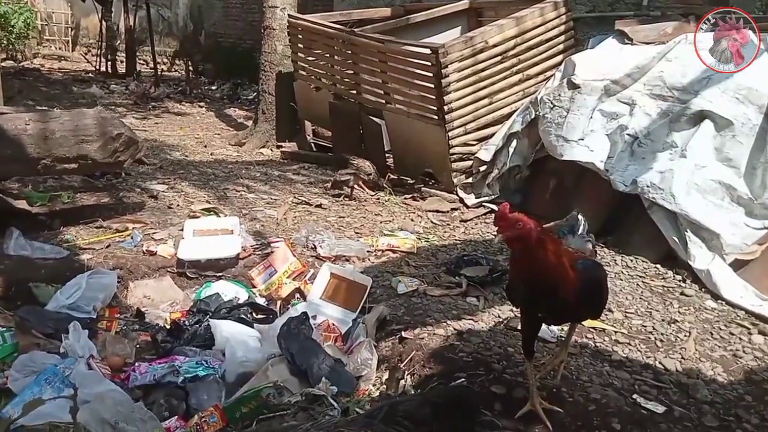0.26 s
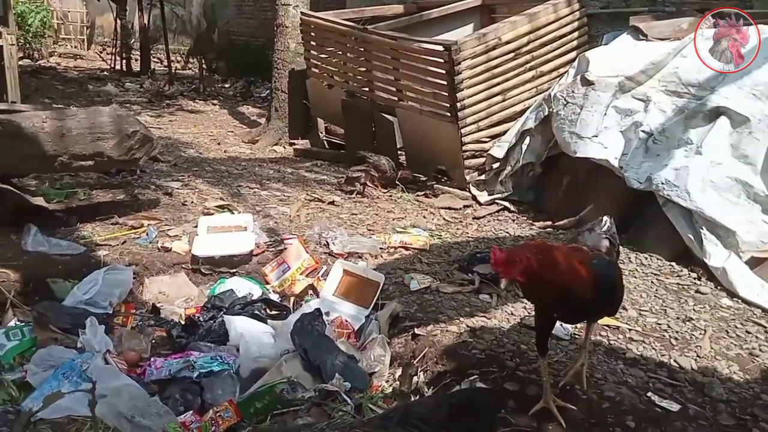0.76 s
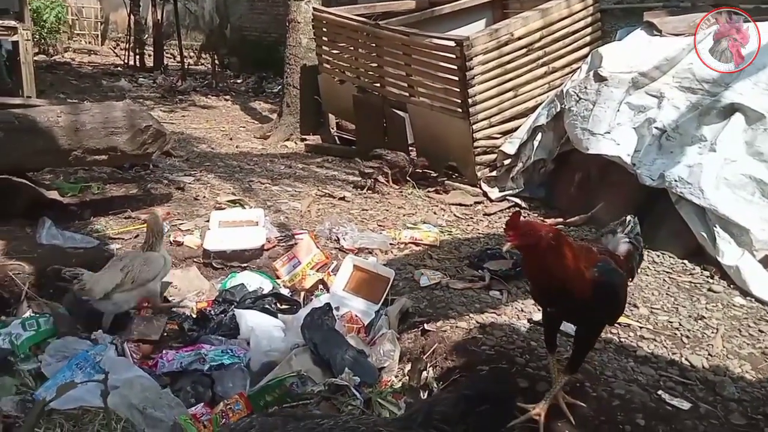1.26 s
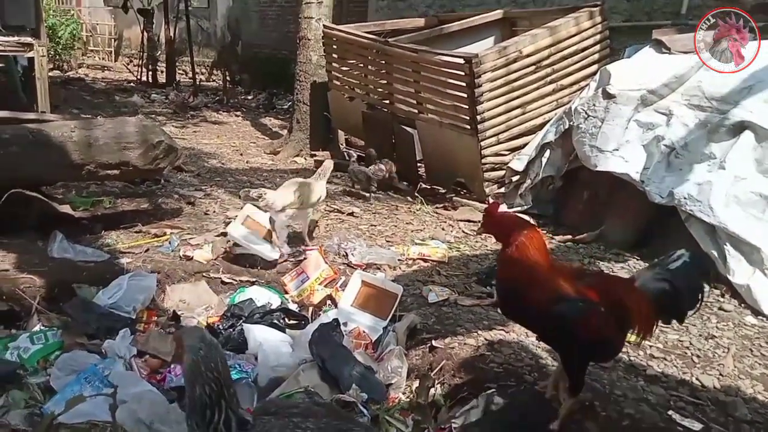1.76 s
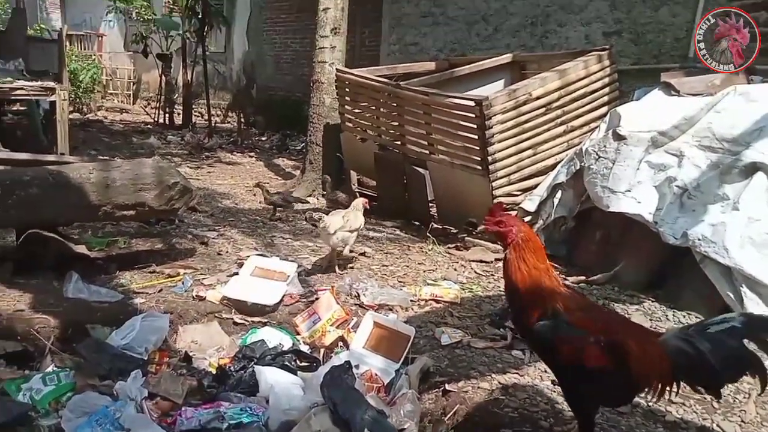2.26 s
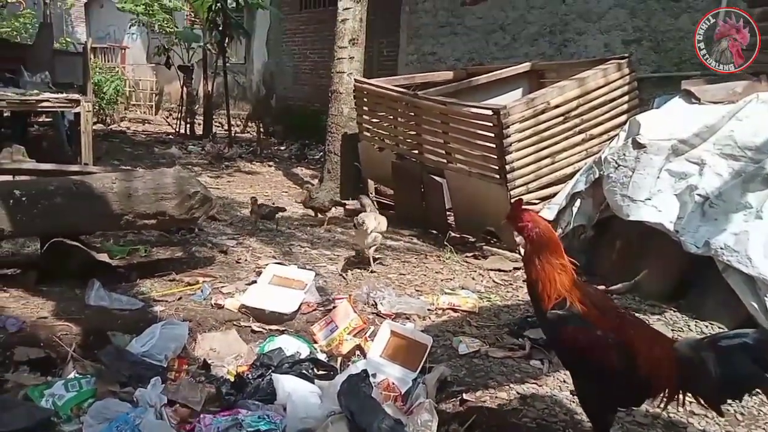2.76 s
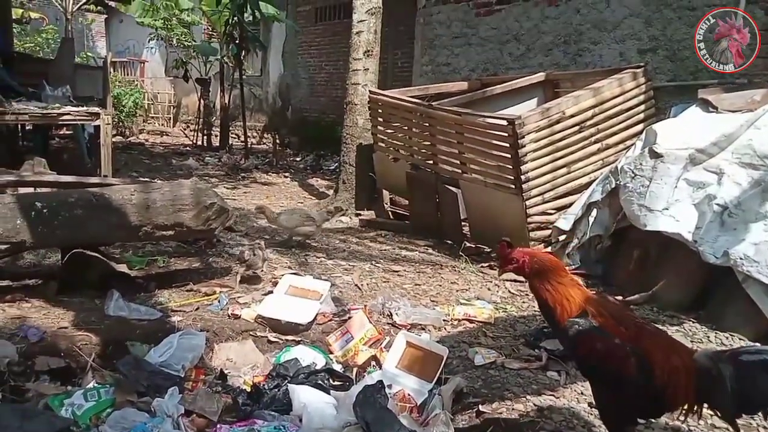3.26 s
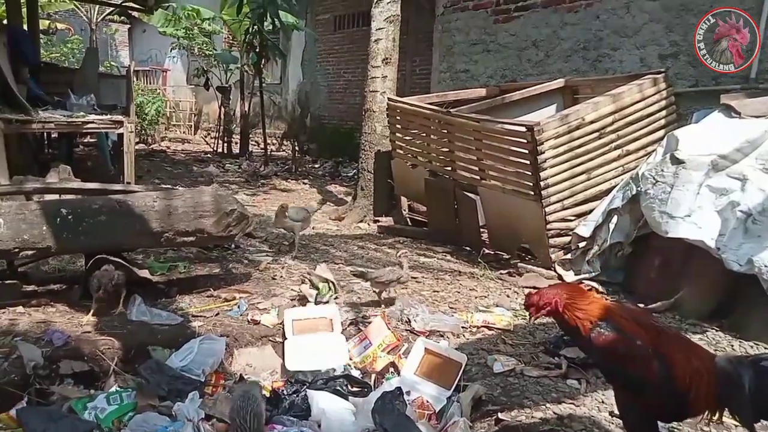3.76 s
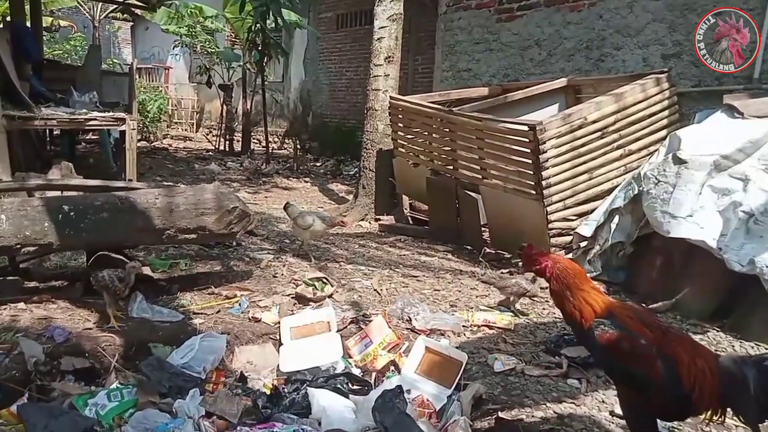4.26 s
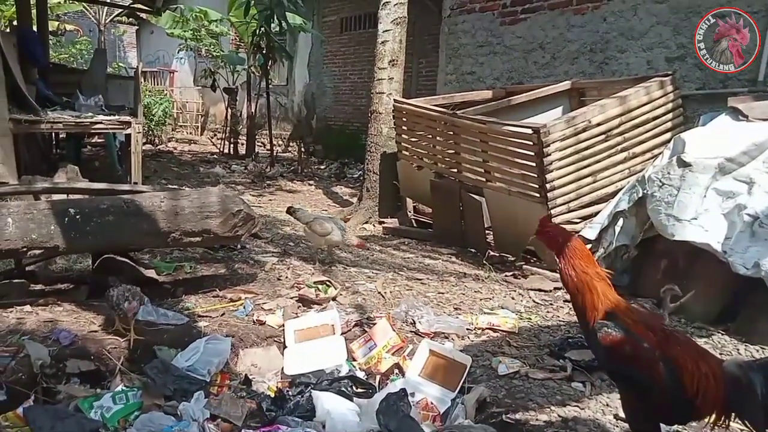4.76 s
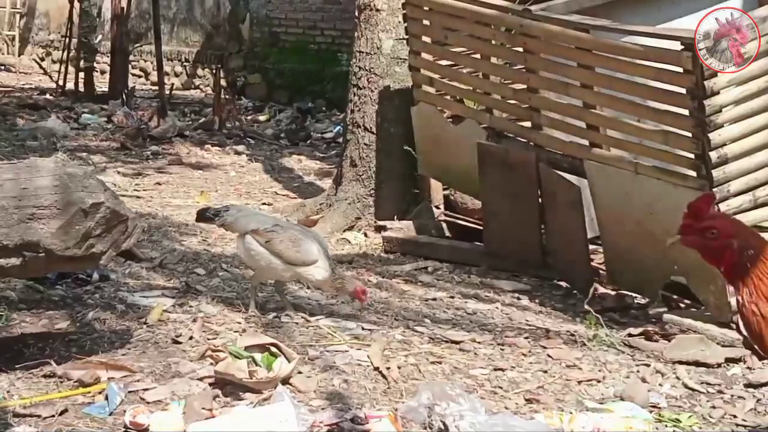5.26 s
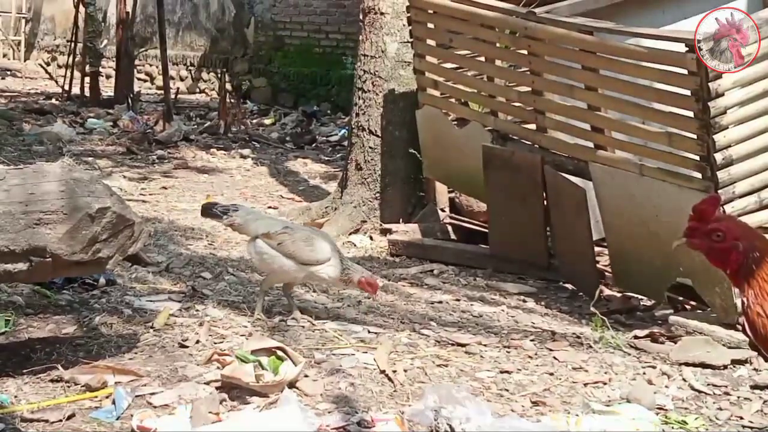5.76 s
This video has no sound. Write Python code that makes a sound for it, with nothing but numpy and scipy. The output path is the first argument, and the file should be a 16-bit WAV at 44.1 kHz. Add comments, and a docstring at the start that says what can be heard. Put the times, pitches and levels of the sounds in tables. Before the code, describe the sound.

Bursts of crisp leaf rustling and sharp cracks over airy outdoor hiss, with thin chick peeps and later low, husky hen clucks.

```python
"""A dusty yard strewn with dry leaves and litter, where chickens walk about; both channels are alike.
Feet crunch leaves and scuff soil as bursts of tiny fractures; brittle leaves snap as ringing cracks.
Bumped litter knocks in two damped modes. Chicks peep in gliding tones, a hen croons in tone and husky noise.
A brood twitters farther off in blurred peeps, and the open air is a fading rumble, rush and hiss of noise."""
import sys
import numpy as np
from scipy import signal
from scipy.fft import rfft, irfft
from scipy.io import wavfile

SR = 44100
rng = np.random.default_rng(int(sys.argv[2]) if len(sys.argv) > 2 else 0)


def int16_out(signal):
    """Quantize to a 16-bit WAV file."""
    q = np.round(np.clip(np.atleast_2d(signal).T, -1, 1) * 32767)
    wavfile.write(sys.argv[1], SR, q.astype(np.int16))


N = 264600


def from_db(db):
    """Decibels to gain."""
    return 10 ** (np.asarray(db) / 20)


def rms_one(x):
    """Scale to unit rms."""
    return x / np.sqrt(np.mean(x ** 2) + 1e-20)


def clock():
    """Time of every sample [s]."""
    return np.arange(N) / SR


def decay(t, t60):
    """Exponential decay that falls by 60 dB in t60 seconds."""
    return np.exp(-np.log(1000) * t / t60)


def coloured(x, spectrum, skirt_db=40):
    """Give x a spectrum that falls by skirt_db an octave beyond its ends; rms 1."""
    hz, db = np.transpose(spectrum)
    octave = np.log2(np.maximum(np.fft.rfftfreq(N, 1 / SR), 1))
    known = np.log2(hz)
    outside = np.abs(octave - np.clip(octave, known[0], known[-1]))
    gain = from_db(np.interp(octave, known, db) - skirt_db * outside)
    return rms_one(irfft(rfft(x) * gain, N))


def drift(rate, count=N):
    """Random wander in straight lines between `rate` normal random values a second."""
    at = np.arange(count) / SR * rate
    knots = rng.standard_normal(int(at[-1]) + 2)
    return np.interp(at, np.arange(len(knots)), knots)


def swell(start, end, edge):
    """An arch between two times; a small edge power makes it squarer."""
    along = np.clip((clock() - start) / (end - start), 0, 1)
    return (4 * along * (1 - along)) ** edge


def resonance(x, hz, width_hz):
    """A two-pole resonance with gain 1 on top."""
    radius = np.exp(-np.pi * width_hz / SR)
    angle = 2 * np.pi * hz / SR
    zeros = np.array([1, 0, -1]) * (1 - radius ** 2) / 2
    poles = [1, -2 * radius * np.cos(angle), radius ** 2]
    return signal.lfilter(zeros, poles, x)


def add(out, s, sound):
    """Mix a short sound in at time s."""
    at = int(s * SR)
    out[at:at + len(sound)] += sound[:max(N - at, 0)]


def grains(per_s, spread_db):
    """Random tiny fractures; a positive spread makes a few much larger, a negative one much smaller."""
    sizes = from_db(spread_db * np.minimum(rng.exponential(1, N), 4))
    signs = rng.choice([-1, 1], N)
    return sizes * signs * (rng.random(N) < per_s / SR)


def arch(length_s, pitches):
    """A smooth glide through a first, a middle and a last pitch."""
    curve = np.polyfit([0, .5, 1], pitches, 2)
    return np.polyval(curve, np.linspace(0, 1, int(length_s * SR)))


def call(hz, octave_db, jitter, shimmer_db, edge):
    """A bird's note: a tone and its octave follow a pitch glide, unsteady in pitch and strength."""
    along = np.linspace(0, 1, len(hz))
    unsteady_hz = hz * (1 + jitter * drift(420, count=len(hz)))
    phase = 2 * np.pi * np.cumsum(unsteady_hz) / SR
    tone = np.sin(phase) + from_db(octave_db) * np.sin(2 * phase)
    shimmer = from_db(shimmer_db * drift(297, count=len(hz)))
    effort = np.abs(np.sin(np.pi * along)) ** edge * shimmer
    return np.sqrt(2) * tone * effort


def husk(hz, flutter_hz):
    """Hoarse voice: a narrow band of noise that follows the pitch."""
    phase = 2 * np.pi * np.cumsum(hz) / SR
    sine_part = drift(flutter_hz, count=len(hz)) * np.sin(phase)
    cosine_part = drift(flutter_hz, count=len(hz)) * np.cos(phase)
    return rms_one(sine_part + cosine_part)


def scatter(x, t60, dull_hz=9000):
    """Diffuse reflections from walls, crate and litter, about as strong as x."""
    t = np.arange(SR // 2) / SR
    tail = rng.standard_normal(len(t)) * decay(t, t60)
    tail = signal.lfilter(*signal.butter(1, dull_hz, fs=SR), tail)
    return signal.fftconvolve(x, tail / np.linalg.norm(tail))[:N]


def footsteps(stray_db=-57, clump_db=-2.5, clumps_per_s=110):
    """Each foot crushes leaves in uneven clumps, scuffs soil and drags its claws; stray leaves tick throughout."""
    # feet in the leaves: (start [s], end [s], leaf crunch [dB], dull soil scuff [dB], claw rasp [dB])
    steps = [(0.694, 0.779, -34, -55, -57), (0.885, 0.93, -36.5, -60, -41), (.915, 1.01, -35, -56, -40.5),
             (1.03, 1.1, -42.5, -53, -56), (1.203, 1.328, -35, -45, -43), (1.337, 1.423, -41, -42, -45),
             (1.412, 1.528, -37.5, -44.5, -44), (1.53, 1.604, -41, -57, -41.5),
             (1.603, 1.675, -36, -38.5, -42), (1.667, 1.725, -35.5, -45, -37),
             (1.797, 1.97, -42.5, -61, -47), (2.035, 2.066, -43.5, -61, -52), (2.58, 2.617, -46, -47, -43),
             (2.956, 3.055, -40.5, -48, -42), (3.05, 3.203, -45, -54, -45), (3.35, 3.44, -46, -52, -47),
             (3.47, 3.6, -42, -41.5, -40), (4.275, 4.34, -57, -46.5, -53), (5.267, 5.29, -38, -47, -51),
             (5.286, 5.317, -38, -43, -43), (5.31, 5.46, -47, -45.5, -50)]
    # colours of crushed leaves, scuffed soil and rasping claws: (frequency [Hz], density [dB per Hz])
    leaf_colour = [(1500, -0.5), (3300, -7.5), (4900, 4.5), (6500, 1), (8000, 4.5), (9300, 12),
                   (10500, 5.5), (11600, 0), (13000, -5), (15500, -2.5)]
    soil_colour = [(50, -30), (140, 12), (270, 8), (450, 3.5), (900, 4), (1700, 5.5), (3000, -2), (6000, 0)]
    claw_colour = [(3900, -13), (4700, 1), (5600, 1), (6600, -2), (8000, -4)]
    crunch, scuff, drag = np.zeros((3, N))
    for start, end, crunch_db, scuff_db, rasp_db in steps:
        press = swell(start, end, edge=0.66)
        crunch += from_db(crunch_db) * press
        scuff += from_db(scuff_db) * press
        drag += from_db(rasp_db) * press
    clumps = from_db(clump_db * drift(clumps_per_s))
    leaves = crunch * clumps * coloured(grains(per_s=4900, spread_db=3.5), leaf_colour)
    soil = scuff * coloured(grains(per_s=3200, spread_db=-2.0), soil_colour)
    claws = drag * coloured(grains(per_s=1700, spread_db=3.0), claw_colour)
    stray = from_db(stray_db) * coloured(grains(per_s=370, spread_db=1.0), leaf_colour)
    return leaves + soil + claws + stray


def snaps(low_hz=4200, dip_hz=13200, dip_width_hz=3000, dip_share=0.7):
    """Brittle pieces crack: a noise burst rings one resonance, broad and short or narrower and clearer."""
    # leaves and litter snapping under beak or claw:
    # (time [s], peak level [dB], pitch [Hz], 60 dB decay of the burst [s], sharpness of the ring [Q])
    cracks = [(0.7255, -25, 6500, .005, 2.5), (0.9033, -25, 9200, .02, 3), (0.912, -26, 5000, .014, 5),
              (.979, -26, 4750, .014, 6), (1.3776, -23, 9000, .006, 3), (1.4282, -20, 5400, .006, 3),
              (1.438, -20.5, 5100, .012, 3), (1.494, -20.5, 4960, .016, 4.4), (1.5197, -24, 9200, .005, 3),
              (1.649, -17, 4800, 0.0088, 2.4), (1.6555, -22, 4800, .012, 4), (1.678, -24, 8000, .014, 6),
              (1.6888, -20, 4950, 0.014, 9), (1.6948, -18, 4820, 0.024, 9), (1.7, -19, 5060, 0.018, 8),
              (1.7235, -25, 9500, .01, 8), (3.0177, -19, 7000, 0.0042, 5.1), (3.0663, -23, 4500, .008, 6),
              (3.3348, -22, 8550, .02, 9), (3.4895, -23, 5760, .016, 4.1), (5.2533, -25, 6500, .012, 2),
              (5.266, -13.5, 6540, .009, 3.7), (5.27, -11.5, 9500, .003, 4.7),
              (5.2762, -22, 9800, 0.0074, 2), (5.294, -14, 7300, 0.0025, 1.8),
              (5.2984, -12.5, 6700, 0.0026, 2.5), (5.3877, -18, 5730, 0.012, 2.4),
              (5.3978, -23.5, 6500, .005, 1.5), (5.4623, -27, 6950, .004, 2), (5.4924, -27, 8500, 0.012, 2),
              (5.555, -26, 8000, .006, 1.1), (5.6696, -18.5, 7600, 0.0059, .9),
              (5.6765, -30, 9000, 0.054, .8)]
    out, t = np.zeros(N), np.arange(SR // 25) / SR
    thin = signal.butter(2, low_hz, "high", fs=SR, output="sos")
    for s, db, hz, t60, sharpness in cracks:
        burst = rng.choice([-1, 1], len(t)) * decay(t, t60)
        crack = signal.sosfilt(thin, resonance(burst, hz, hz / sharpness))
        crack = crack - dip_share * resonance(crack, dip_hz, dip_width_hz)   # a hollow in the high treble
        add(out, s, from_db(db) * crack / np.abs(crack).max())
    return out


def bumps(rise_s=0.00069, overtone=1.895, overtone_db=-5.5, crinkle_db=1, crinkle_t60=0.035):
    """A soft bump sets light litter ringing for a few cycles in two damped modes, and its skin crinkles."""
    # feet or beak on hollow litter: (time [s], peak level [dB], pitch [Hz], 60 dB decay of the modes [s])
    knocks = [(1.4367, -19, 740, 0.015), (1.7008, -22.5, 1586, 0.015), (1.704, -28.5, 1000, 0.01),
              (1.7112, -28, 884, 0.013), (1.7125, -34, 1550, .014), (3.002, -24, 2150, 0.0081),
              (3.49, -24.5, 930, 0.0085), (5.265, -27.5, 1420, .004)]
    out, t = np.zeros(N), np.arange(SR // 10) / SR
    for s, db, hz, t60 in knocks:
        low_mode = np.sin(2 * np.pi * hz * t)
        high_mode = from_db(overtone_db) * np.sin(2 * np.pi * hz * overtone * t)
        crinkle = from_db(crinkle_db) * resonance(rng.standard_normal(len(t)), hz, hz)
        knock = (low_mode + high_mode) * decay(t, t60) + crinkle * decay(t, crinkle_t60)
        knock = knock * (1 - np.exp(-t / rise_s))   # soft onset
        add(out, s, from_db(db) * knock / np.abs(knock).max())
    return out


def chicks():
    """Thin whistles: a tone and its octave glide through three pitches, unsteady in pitch and strength."""
    # chick peeps: (start [s], end [s], first pitch [Hz], middle pitch [Hz], last pitch [Hz], level [dB])
    peeps = [(2.982, 3.005, 4140, 4100, 4300, -42), (3.187, 3.21, 4830, 4200, 3450, -41),
             (3.305, 3.337, 4910, 4450, 2870, -35), (4.829, 4.858, 3630, 3540, 3480, -49),
             (5.005, 5.055, 3750, 3520, 3320, -52), (5.14, 5.2, 4580, 4760, 4520, -44.5),
             (5.622, 5.675, 4540, 4380, 4220, -45.5), (5.778, 5.808, 4180, 4170, 3950, -51),
             (5.808, 5.845, 3560, 3430, 3200, -47), (5.884, 5.946, 3730, 3600, 3450, -54.5),
             (5.962, 6.025, 4450, 4540, 4230, -48.5)]
    # lower peeps are reedier: (first pitch [Hz], octave overtone against the tone [dB])
    reediness = [(3500, -1), (4400, -26)]
    out = np.zeros(N)
    for start, end, first_hz, middle_hz, last_hz, db in peeps:
        octave_db = np.interp(first_hz, *np.transpose(reediness))
        glide = arch(end - start, (first_hz, middle_hz, last_hz))
        peep = call(glide, octave_db, jitter=.019, shimmer_db=3.2, edge=.25)
        add(out, start, from_db(db) * peep)
    return out


def hen(jitter=0.022, swell_db=5, low_flutter_hz=360, high_flutter_hz=240):
    """Soft notes through a nearly closed beak slide up to a held pitch and on to a last, husky at both ends."""
    # the hen's notes: (start [s], end [s], first pitch [Hz], held pitch [Hz], last pitch [Hz], level [dB],
    # octave overtone against the tone [dB], roughness of the held part [0-1])
    croons = [(5.195, 5.3, 715, 745, 770, -56, 6.5, .88), (5.29, 5.325, 810, 812, 818, -54.5, 11.5, .4),
              (5.31, 5.43, 840, 880, 890, -60, 6.5, .95), (5.498, 5.695, 715, 803, 765, -48, 6.8, .33),
              (5.805, 6.06, 775, 790, 785, -50.5, 0, .84)]
    stages = [0, 0.288, 0.58, 1]   # shares of a note; the pitch is level between the middle two
    edge_rough = 0.88   # the voice breaks up as a note starts and ends
    edge_dull_db = 12   # the overtone of a wholly clear note would sink this far there
    out = np.zeros(N)
    for start, end, first_hz, held_hz, last_hz, db, octave_db, held_rough in croons:
        along = np.linspace(0, 1, int((end - start) * SR))
        hz = np.interp(along, stages, [first_hz, held_hz, held_hz, last_hz])
        slack = np.interp(along, stages, [1, 0, 0, 1])
        sag = slack * (1 - held_rough)   # hoarse notes swell and brighten less
        loudness = from_db(db - swell_db * sag) * np.sin(np.pi * along).clip(0) ** .25
        overtone_db = octave_db - edge_dull_db * sag
        rough = np.clip(held_rough + slack * (edge_rough - held_rough), 0, 1)
        clear = call(hz, overtone_db, jitter * rough, shimmer_db=0.5, edge=0)
        hoarse = husk(hz, low_flutter_hz) + from_db(overtone_db) * husk(2 * hz, high_flutter_hz)
        add(out, start, loudness * (np.sqrt(1 - rough ** 2) * clear + rough * hoarse))
    return out


def brood(count=380, hz=4520, spread_hz=450, fall_hz=280, length_s=.055, blur_t60=0.26):
    """Many faint falling peeps, blurred by distance into a soft twitter."""
    # chicks farther off: (time [s], level [dB])
    twitter_level = [(0, -80), (2.75, -52), (3.1, -44), (3.4, -44.5), (4.2, -51.5), (5.2, -50), (6, -59)]
    out = np.zeros(N)
    starts = (np.arange(count) + rng.random(count)) * N / SR / count
    for start in starts:
        pitch = hz + spread_hz * rng.standard_normal()
        glide = arch(length_s, (pitch + fall_hz, pitch, pitch - fall_hz))
        peep = call(glide, octave_db=-14, jitter=0.0278, shimmer_db=5, edge=0.34)
        add(out, start, peep)
    level_db = np.interp(clock(), *np.transpose(twitter_level))
    return rms_one(scatter(out, blur_t60)) * from_db(level_db)


def background(flutter_db=1.0, flutters_per_s=24.835, early_fade_db_per_s=0.46):
    """Open air as three coloured noises, flickering in level, sinking gently, then faster, and growing duller."""
    # one row each for rumble, rush and hiss:
    # (level at the start [dB], start of the faster fade [s], rate of the faster fade [dB per s])
    air = [(-46.5, 3.77, 4), (-40, 3.93, 4.5), (-39, 4.08, 4.5)]
    # colours of the three parts: (frequency [Hz], density [dB per Hz])
    rumble_colour = [(25, -28), (45, -21), (64, -4.5), (120, 0.5), (165, -3), (235, 4), (270, -2), (340, 0),
                     (400, -3.5), (485, -12.5), (600, -15)]
    rush_colour = [(420, -8), (520, -4), (650, 0), (1060, 0), (1400, 2), (1900, 5), (2350, 5), (2900, 2),
                   (4000, -0.5)]
    hiss_colour = [(3200, -6.5), (4600, 2), (5600, -1), (6900, 0), (7850, -4), (8700, 0), (9400, 3),
                   (10500, -3.5), (11300, -8), (12300, -12.5), (14000, -14.5), (17000, -16)]
    t = clock()
    gains = []
    for db, fade_start, db_per_s in air:
        early_fade = early_fade_db_per_s * np.minimum(t, fade_start)
        late_fade = db_per_s * np.maximum(t - fade_start, 0)
        gains.append(from_db(db - early_fade - late_fade + flutter_db * drift(flutters_per_s)))
    rumble, rush, hiss = gains
    out = rumble * coloured(rng.standard_normal(N), rumble_colour)
    # rush and hiss slide down in colour as the microphone turns
    turned = np.interp(t, [2.35, 5.9], [0, 1])
    ratio_before, ratio_after = 1.005, 0.9   # frequency ratios of the colours
    for gain, spectrum in ((rush, rush_colour), (hiss, hiss_colour)):
        white = rng.standard_normal(N)
        for ratio, share in ((ratio_before, 1 - turned), (ratio_after, turned)):
            out += gain * share * coloured(white, np.array(spectrum) * [ratio, 1])
    return out


def scene(feet_wet_db=-8, feet_t60=0.23, voice_wet_db=-12.5, voice_t60=0.5):
    """The birds and their reflections in the yard over the open air, alike in both channels."""
    feet = footsteps() + snaps() + bumps()
    voices = chicks() + hen()
    feet_echo = from_db(feet_wet_db) * scatter(feet, feet_t60)
    voice_echo = from_db(voice_wet_db) * scatter(voices, voice_t60)
    mono = feet + voices + feet_echo + voice_echo + brood() + background()
    return np.stack([mono, mono])


def record(dry, cutoff_hz=15750):
    """The top is cut steeply by an elliptic low-pass."""
    steep = signal.ellip(12, .2, 80, cutoff_hz, fs=SR, output="sos")   # order, ripple and stop depth in dB
    return signal.sosfilt(steep, dry)


dry = scene()
out = record(dry)
int16_out(out)
```